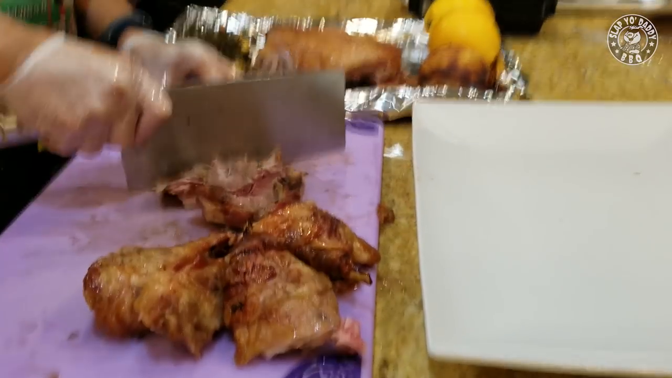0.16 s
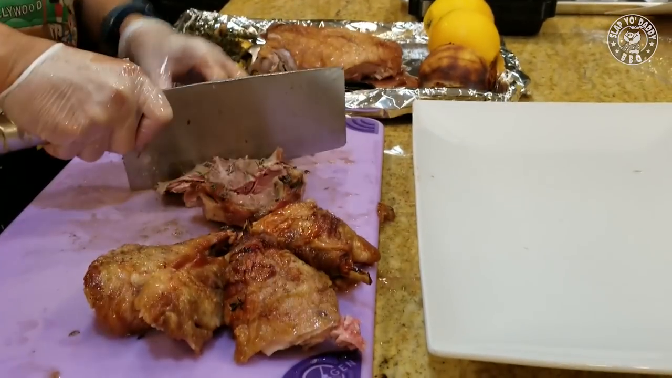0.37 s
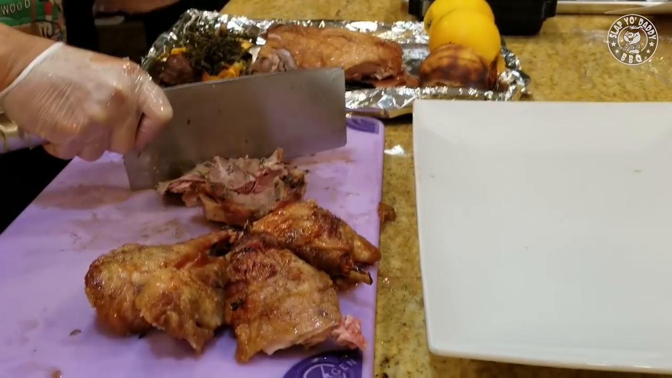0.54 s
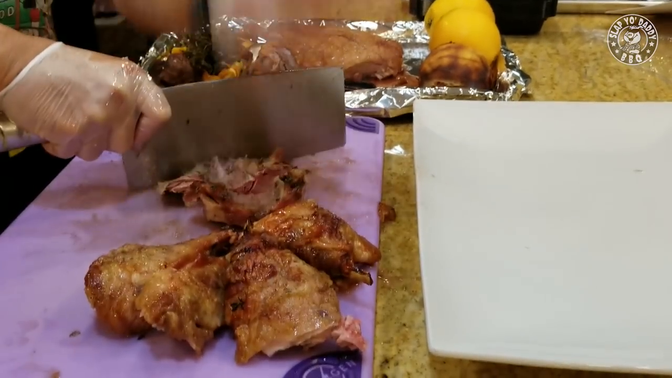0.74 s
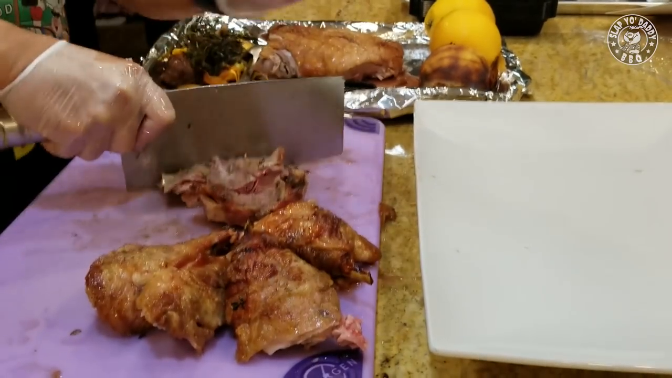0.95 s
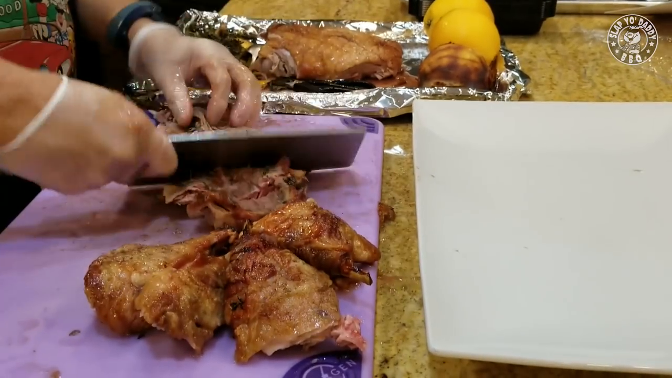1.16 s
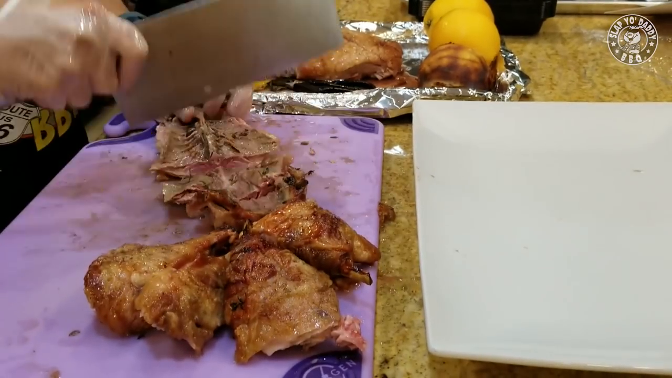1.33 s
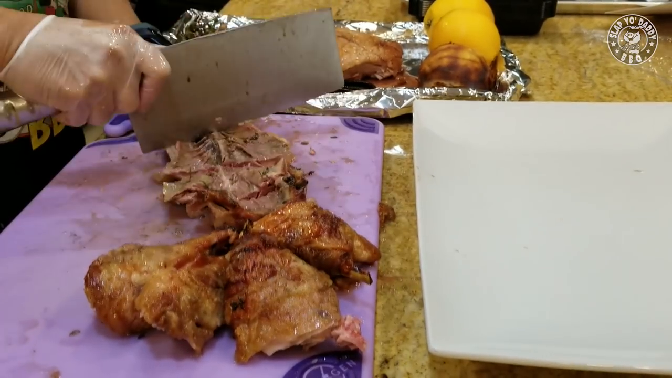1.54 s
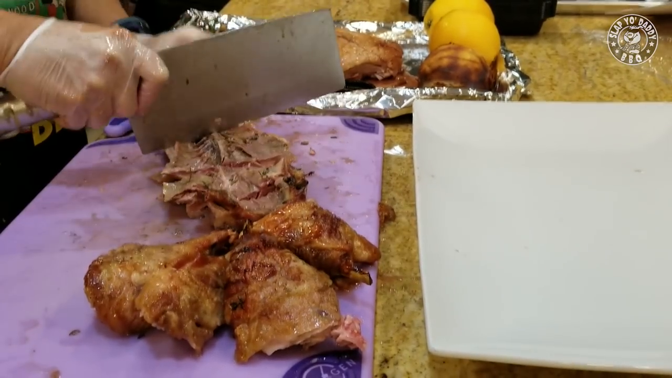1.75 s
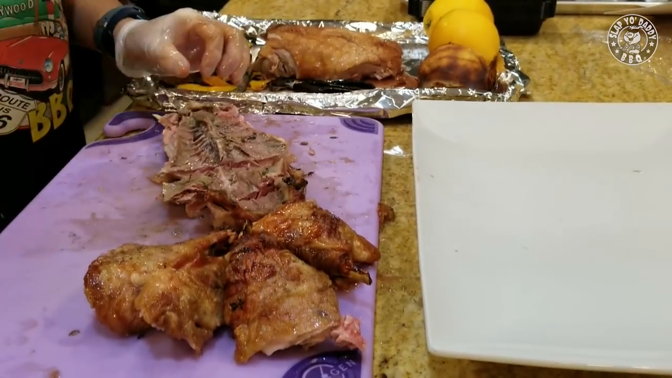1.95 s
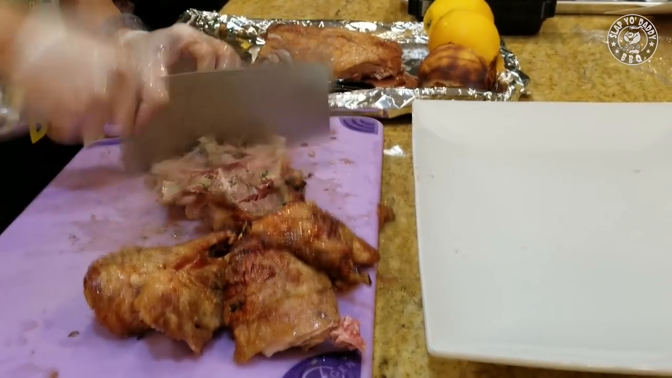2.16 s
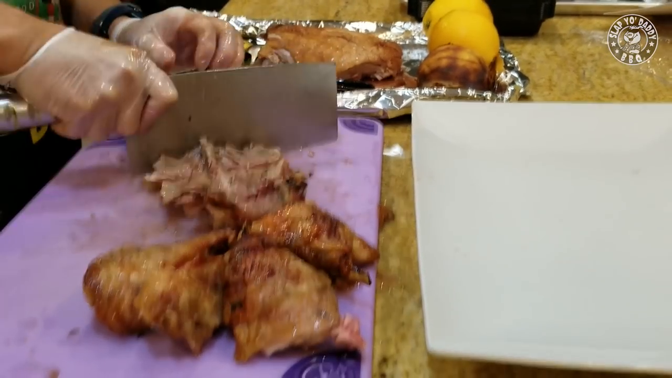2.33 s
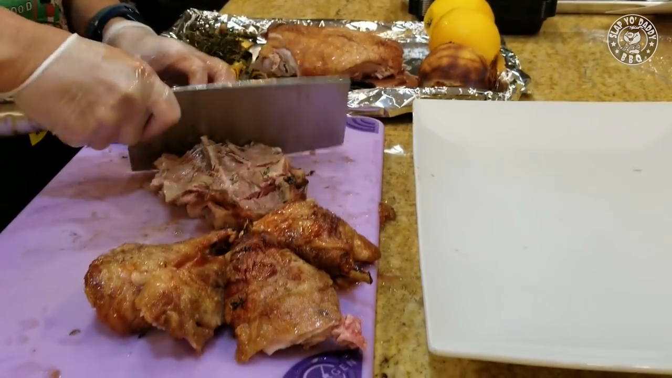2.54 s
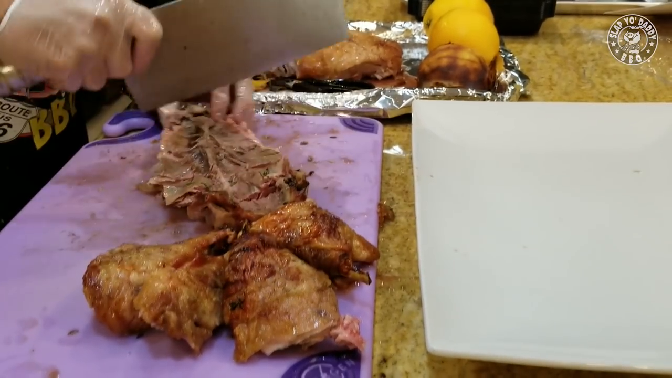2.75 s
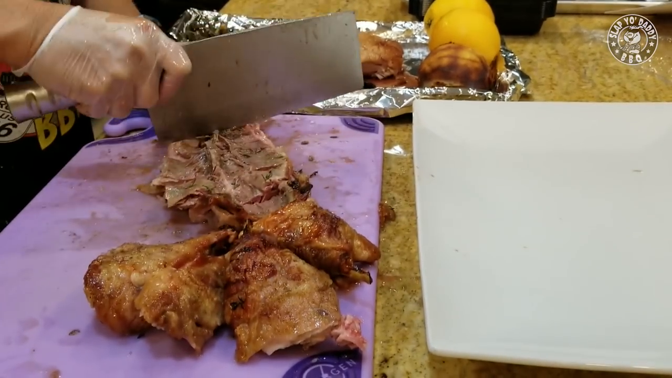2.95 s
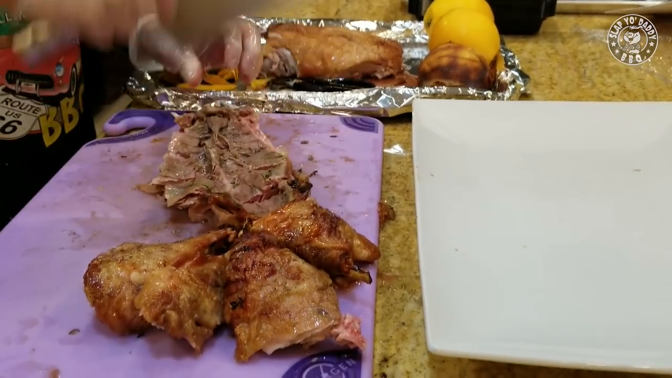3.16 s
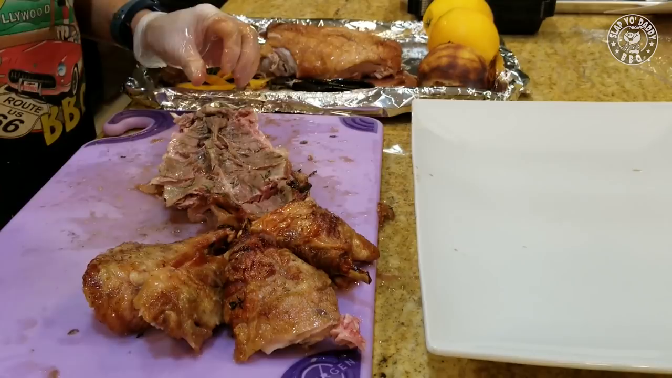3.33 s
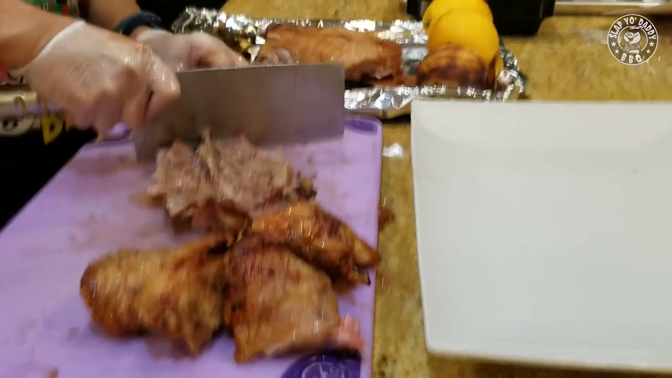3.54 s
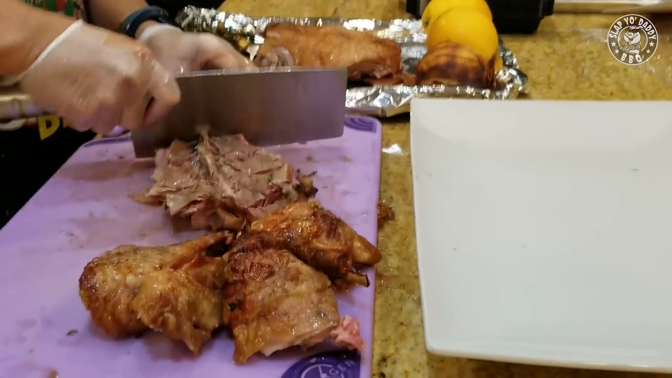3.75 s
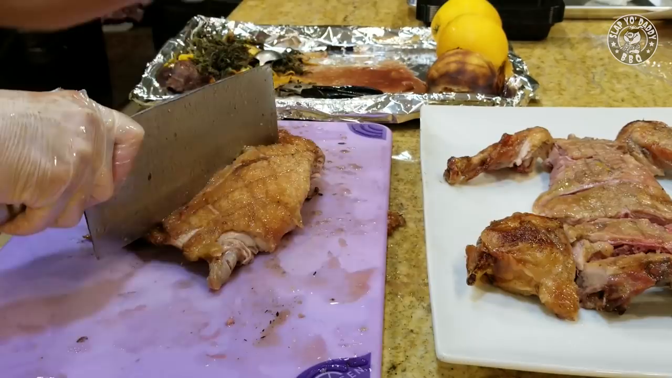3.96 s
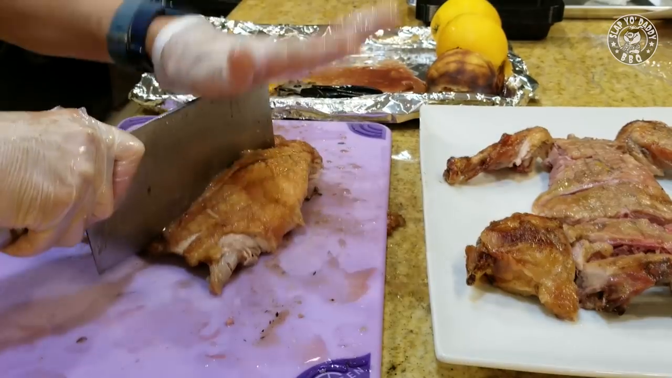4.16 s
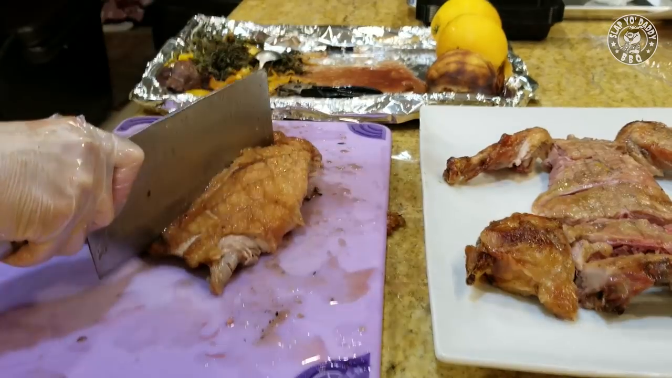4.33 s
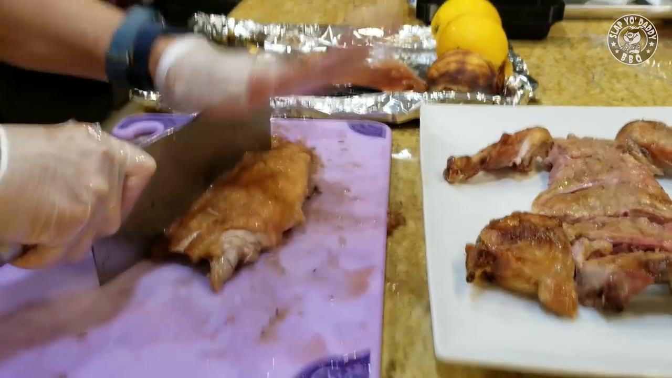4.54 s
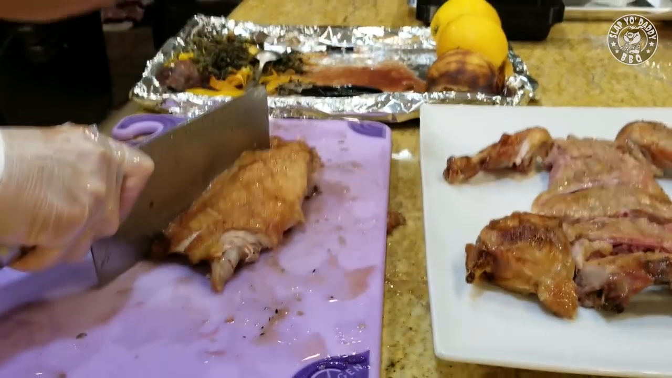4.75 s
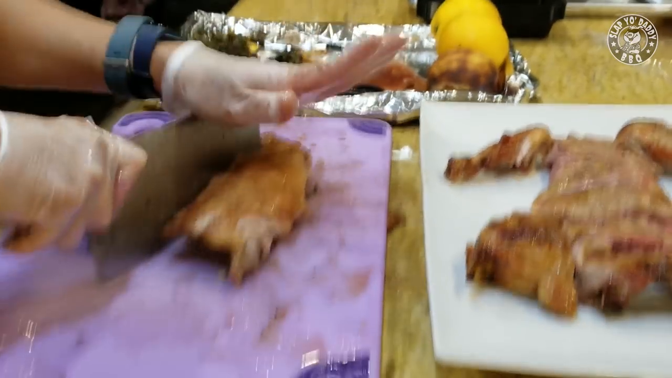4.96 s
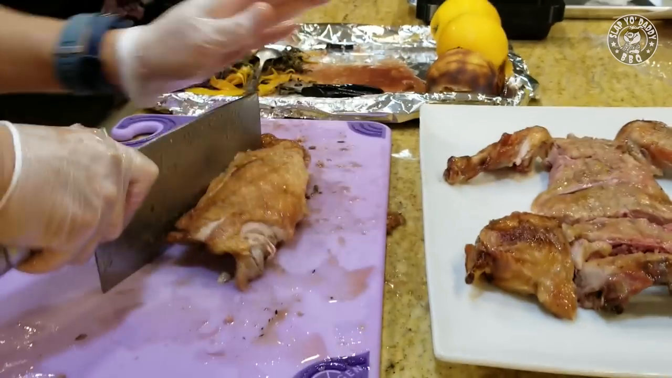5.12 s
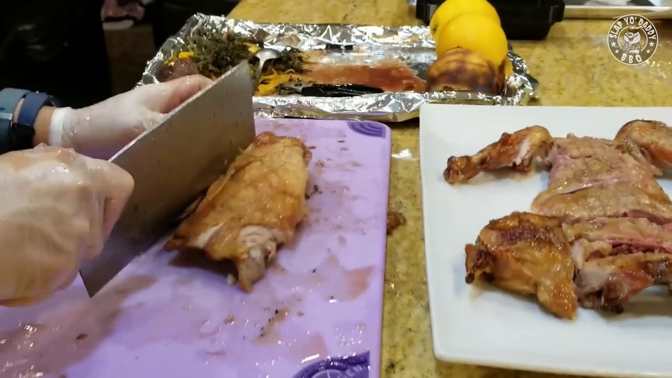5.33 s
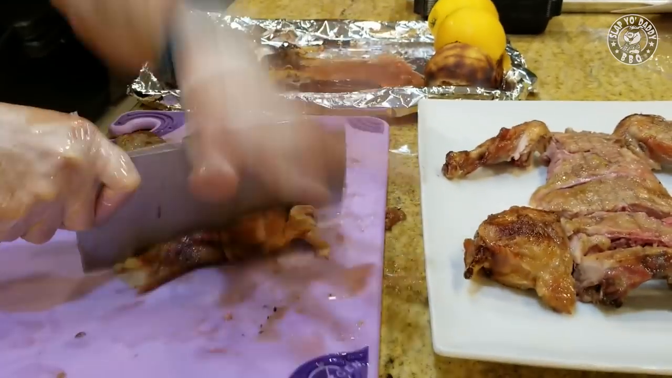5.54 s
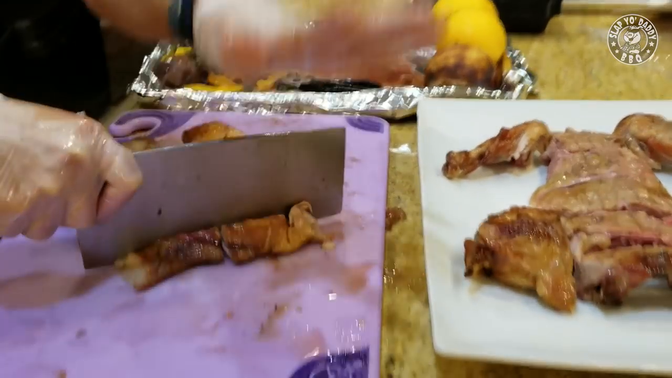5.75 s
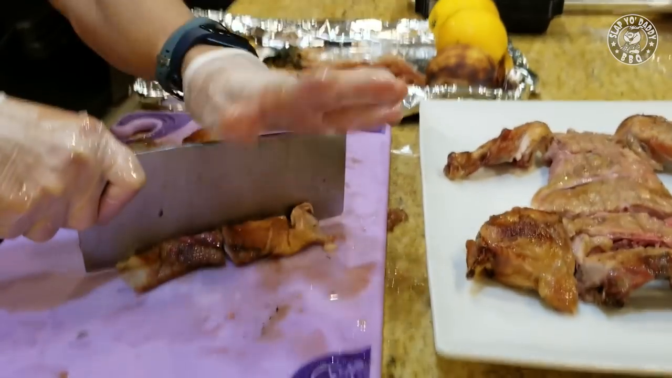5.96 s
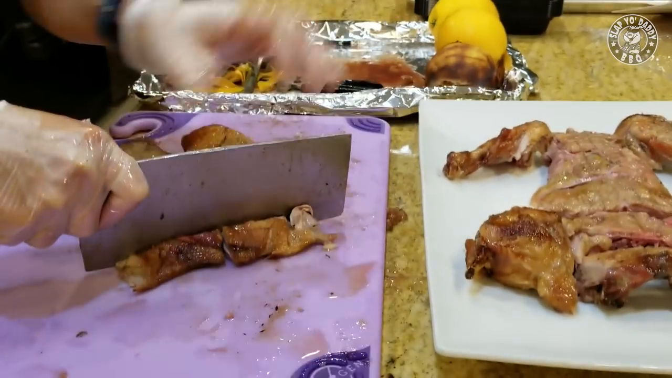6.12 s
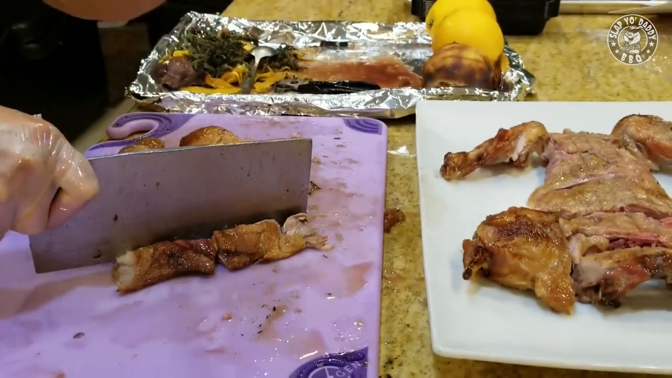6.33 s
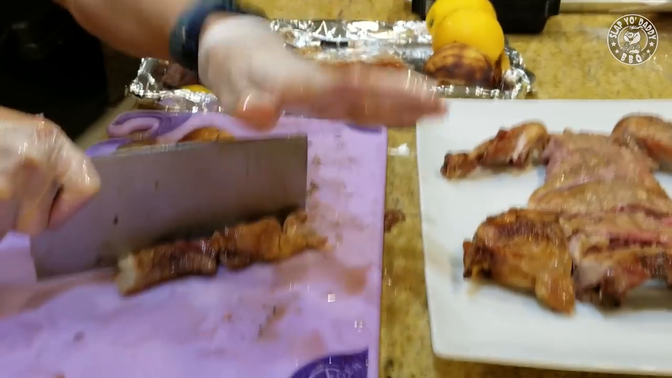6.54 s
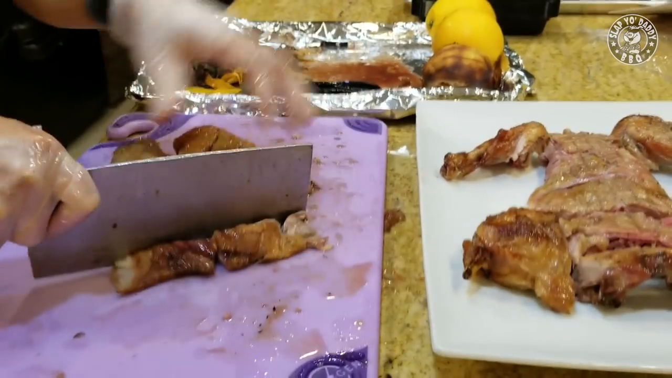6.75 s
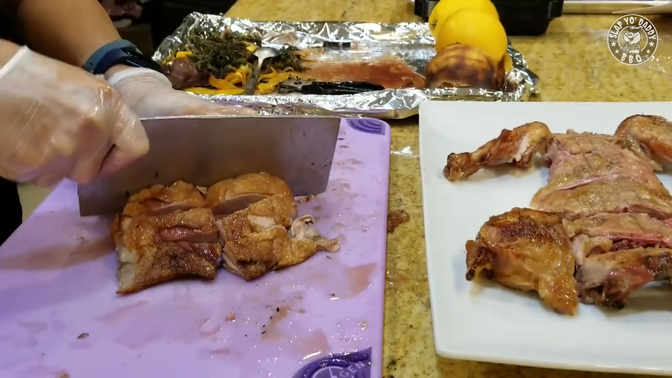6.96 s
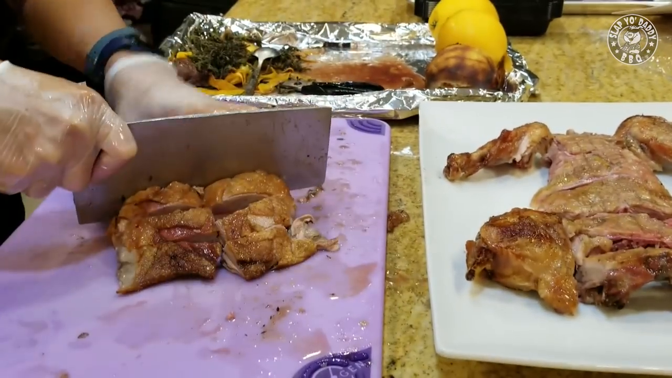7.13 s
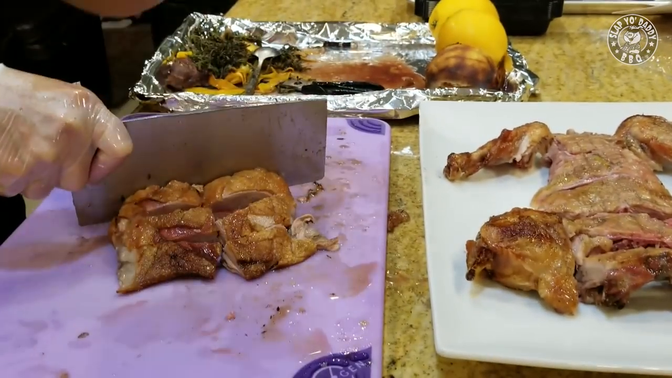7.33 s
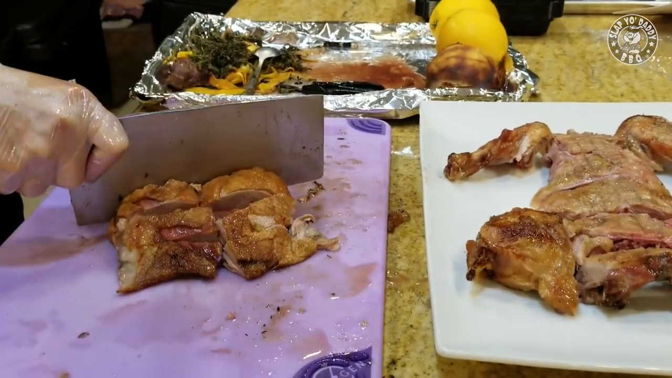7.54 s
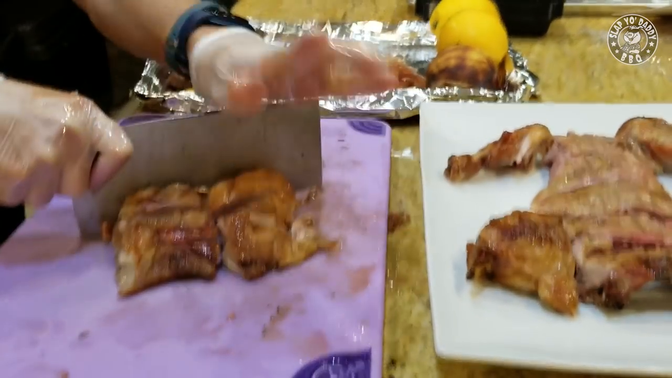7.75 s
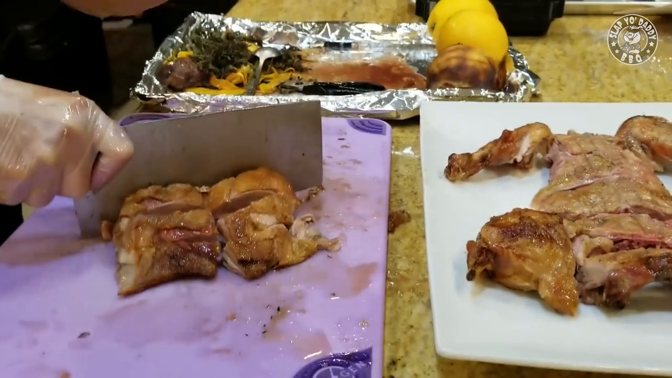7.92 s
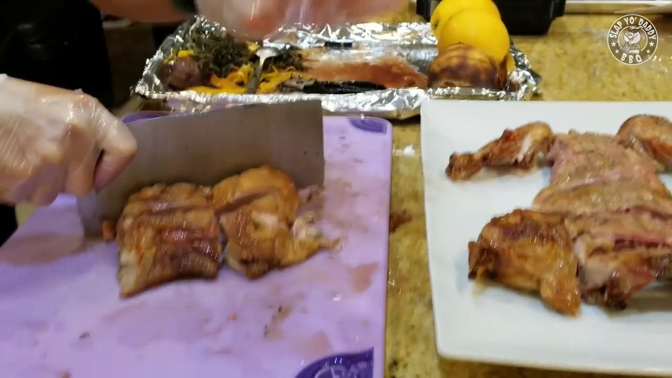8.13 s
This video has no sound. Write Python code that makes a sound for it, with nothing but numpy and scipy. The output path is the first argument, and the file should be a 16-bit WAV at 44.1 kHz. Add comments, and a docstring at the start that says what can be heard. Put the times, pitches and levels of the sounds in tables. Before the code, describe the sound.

A heavy cleaver lands hard, uneven chops through roast meat on a plastic board, foil tray rattling after the blows in a reverberant kitchen.

```python
"""A cleaver chops roast meat on a plastic board on a stone counter, close to two ports in a hard kitchen.
From the start blows crack (resonant bursts), knock (shaped noise), ring board and counter (damped modes) and
fill the room; a foil tray rattles in threes (noise ticks). Between 1.1 and 3 s the blade tinks four times (modes).
The noise hum and hiss drift, drop at 2.15 s and jump up at 3.98, 5.45 and 6.99 s.
Near 7.2 s a piece slides over the board (swelling noise); two more blows end the scene."""
import sys
import numpy as np
from scipy import signal
from scipy.fft import rfft, irfft, next_fast_len
from scipy.io import wavfile
from scipy.ndimage import uniform_filter1d, map_coordinates

SR = 44100
rng = np.random.default_rng(int(sys.argv[2]) if len(sys.argv) > 2 else 0)


def store_pcm(level_fs):
    """Save levels as 16-bit WAV."""
    pcm = np.round(np.clip(level_fs, -1, 1) * 32767).astype(np.int16)
    wavfile.write(sys.argv[1], SR, np.atleast_2d(pcm).T)


N = 361046


def amp(db):
    """Gain of a level in dB."""
    return 10 ** (np.asarray(db) / 20)


def unit(x):
    """x at rms 1."""
    return x / np.sqrt(np.mean(x ** 2) + 1e-20)


def along(points, hz):
    """(Hz, value) points interpolated on a log frequency axis."""
    f, v = np.transpose(points)
    return np.interp(np.log(hz + 1), np.log(f + 1), v)


def curves(rows):
    """One value per sample for each column after the time."""
    s, *cols = np.transpose(rows)
    return [np.interp(np.arange(N) / SR, s, c) for c in cols]


def filtered(x, response):
    """x times a complex response of frequency."""
    n = x.shape[-1]
    m = next_fast_len(n + 8192)
    return irfft(rfft(x, m) * response(np.fft.rfftfreq(m, 1 / SR)), m)[..., :n]


def thin(x):
    """x through a two-pole high-pass: skin and knock hold little bass."""
    low_hz = 250
    return filtered(x, lambda f: (1j * f / (low_hz + 1j * f)) ** 2)


# Stereo likeness. Each row: frequency in Hz, left-right correlation (below 0 counts as 0).
LIKENESS = [(60, 0.95), (180, 0.98), (550, 0.65), (1650, -0.056), (4970, 0.1), (15000, -1)]


def rush(spectrum, size):
    """Stereo noise of rms 1; mid and side are mixed for the likeness at each frequency."""
    turn = lambda hz: np.arccos(np.clip(along(LIKENESS, hz), 0, 1)) / 2
    mid, side = filtered(rng.standard_normal((2, size)),
                         lambda hz: spectrum(hz) * [np.cos(turn(hz)), np.sin(turn(hz))])
    return unit(np.array([mid + side, mid - side]))


def wobble(rate):
    """A smooth random curve, rate knots a second."""
    return map_coordinates(rng.standard_normal(N // 100), [np.arange(N) * rate / SR])


def ring(modes_hz, modes, t, rough=0.093):
    """Damped modes at new strengths each time; loose contact makes each waver in strength and phase."""
    knots = rng.standard_normal((2, len(modes), 100))
    knot_at = np.arange(100)
    total = 0
    for hz, (db, t60), a, b in zip(modes_hz, modes, *knots):
        in_phase = np.interp(t * 45, knot_at, a)
        quadrature = np.interp(t * 45, knot_at, b)
        waver = 1 + rough * (in_phase + 1j * quadrature)
        level = amp(db + rng.normal(0, 0.83) - 60 * t / t60)
        total = total + level * np.imag(waver * np.exp(2j * np.pi * hz * t))
    return total


def add(out, s, sound):
    """Mix a sound in at a time in seconds."""
    part = out[:, round(s * SR):][:, :sound.shape[-1]]
    part += sound[..., :part.shape[-1]]


# Blows. Each row: start in seconds, level in dB, room in dB, crunch in seconds, thump in dB, snap in dB,
# treble in dB, skin in dB, board ring in dB, crack in dB.
# Room, skin, ring and crack are relative to the level; thump, snap and treble tilt the spectrum.
# Level, room and crack are before the trims in the code.
BLOWS = [(0.05, 1.5, -6, 0.031, 5.5, 3.5, 2, -44, -22.5, -18),
         (0.733, 5, -11, 0.005, 10.5, 4, -6, -28, -23, -15),
         (1.163, -27, -29, 0.021, -8, -3, 3, -32, -30, -13),
         (2.154, 3, -6, 0.025, -4.5, 7, -7.5, -16, -26, -15),
         (2.202, 5, -12.5, 0.012, -6.5, -1.5, -15, -32, -27, -32.5),
         (2.225, -14, -14.5, 0.021, 17.5, 5, 3.5, -8, -22.5, 0),
         (2.924, -32, -18, 0.014, 12, 8, 8, -31, -28, -18),
         (3.407, 4.5, -14.5, 0.033, -4.5, 1, -4, -20.5, -26.5, -16),
         (3.459, -8.5, -5, 0.018, 4.5, -6.5, -16, -33, -21, -7.5),
         (4.085, -13, -12.5, 0.007, -8.5, 1, 2, -19.5, -36, -9.5),
         (4.094, -21.5, -16, 0.035, -10, 8, 6, -30, -26.5, -1.5),
         (4.5, 4, -10.5, 0.0085, 12, 8, -0.5, -20.5, -29.5, -9.5),
         (4.838, 8, -13, 0.041, 11.5, 4, -6, -43, -27.5, -18),
         (5.546, 4, -9, 0.033, 13.5, 3, -1.5, -18, -22, -18),
         (5.878, -1.5, -10.5, 0.0062, 16.5, 14.5, 1.5, -20.5, -26, -7),
         (6.432, -4, -0.5, 0.024, 10.5, 17, -1, -39.5, -31, -12.5),
         (6.469, 1.5, -12.5, 0.0099, -3, 10.5, -10.5, -17, -26.5, -44.5),
         (7.603, 5.5, -9, 0.03, 10.5, 2.5, -1.5, -29, -23.5, -13),
         (7.984, -2.5, -12, 0.02, 19, 10, 2.5, -21.5, -28, -4)]
# Chop spectrum. Each row: frequency in Hz, density in dB per Hz before the tilt.
CHOP_SPECTRUM = [(24, -47.5), (40, -8.5), (271, -12.5), (349, -12.5), (550, -7), (844, -3), (933, 0.5),
                 (1290, -6), (1620, -9), (7180, -24.5), (8790, -25.5), (12800, -25), (15300, -30.5),
                 (16500, -49.5)]
# Room decay. Each row: frequency in Hz, t60 in seconds.
ROOM_T60 = [(60, .6), (300, 0.38), (1000, 0.43), (3000, 0.5), (8000, 0.58), (16000, 0.79)]
# Board modes: frequency in Hz; then each row: strength in dB, t60 in seconds.
BOARD_HZ = [527, 560, 652, 916, 957, 1055, 1222, 1570, 1690]
BOARD_MODES = [(-5.5, 0.19), (-2, 0.19), (-4.5, 0.4), (4, 0.29), (0, 0.1), (-12, 0.33), (-8, 0.36),
               (-6, 0.34), (-9, 0.52)]
# Counter modes: frequency in Hz; then each row: strength in dB, t60 in seconds.
COUNTER_HZ = [68, 76, 103, 116, 133, 161, 197, 281]
COUNTER_MODES = [(-10, 0.57), (1, 0.98), (-16, 1.1), (-11.5, 1.3), (-6.5, 1.4), (-6.5, 1.1), (-3.5, 0.99),
                 (3, 0.21)]
COUNTER_DB, COUNTER_DB_PER_THUMP_DB = -37.5, .45  # relative to the blow's level
SKIN_LEAD_S = .008  # the skin gives way this long before the edge lands


def chops():
    """Skin gives way, a knock on the board, then the room: full while the blade crunches, dying band by band."""
    out, t = np.zeros((2, N)), np.arange(SR) / SR
    short = t[:SR // 10]
    skin_fade = 1.2 * amp(-60 * short / 0.03) + 0.75 * amp(-60 * short / 0.092)
    skin_fade = skin_fade * (1 - np.exp(-short / 0.0013))
    knock_fade = amp(-60 * short / .045) * (1 - np.exp(-short / 0.00049))
    for s, db, room_db, crunch_s, thump_db, snap_db, treble_db, skin_db, board_db, _ in BLOWS:
        tilt = [(45, thump_db - 14.5), (90, thump_db + 1.5), (250, thump_db),
                (900, 0.029), (2500, snap_db), (9000, treble_db)]
        tone = lambda hz: amp(along(CHOP_SPECTRUM, hz) + along(tilt, hz))
        bright = lambda hz: tone(hz) * (hz / 1000) ** 0.069

        hz, frame_s, z = signal.stft(rush(tone, size=SR), SR, nperseg=256)
        late_s = np.maximum(frame_s - crunch_s, 0)
        # bone and gristle break unevenly: lumps a few ms long, each over a stretch of the spectrum
        lumps = unit(uniform_filter1d(rng.standard_normal(z.shape[1:]), size=12, axis=0))
        decay_db = 1.3 * lumps - 60 * late_s / along(ROOM_T60, hz)[:, None]
        room = signal.istft(z * amp(decay_db), SR, nperseg=256)[1][:, :SR]

        skin = amp(db + skin_db) * skin_fade * rush(bright, size=len(short))
        add(out, s - SKIN_LEAD_S, thin(skin))
        knock = amp(db - 8.5) * knock_fade * rush(bright, size=len(short))
        add(out, s, thin(knock))
        add(out, s, amp(db + room_db - 7) * room * (1 - np.exp(-t / 0.00082)))
        # the two ports hear the board's modes at unlike strengths
        board = np.array([ring(BOARD_HZ, BOARD_MODES, t), ring(BOARD_HZ, BOARD_MODES, t)])
        add(out, s, amp(db + board_db) * board)
        counter_db = COUNTER_DB + COUNTER_DB_PER_THUMP_DB * thump_db
        counter = ring(COUNTER_HZ, COUNTER_MODES, t, rough=0.4) * (1 - np.exp(-t / 0.012))
        add(out, s, amp(db + counter_db) * counter)
    return out


CRACK_HZ, CRACK_OCT_PER_DB = 2200, .045  # a snappier blow cracks higher
CRACK_T60_S, CRACK_Q = .008, 1.2  # decay of the driving noise; sharpness of the resonance


def cracks():
    """The edge meets the board: decaying noise drives a resonance for a few fast cycles."""
    out, t = np.zeros((2, N)), np.arange(SR // 20) / SR
    for s, db, *_, snap_db, _, _, _, crack_db in BLOWS:
        c = CRACK_HZ * 2 ** (CRACK_OCT_PER_DB * snap_db)
        spikes = rng.standard_normal((2, len(t))) * amp(-60 * t / CRACK_T60_S)
        band = lambda f: 1j * f * c / CRACK_Q / (c * c - f * f + 1j * f * c / CRACK_Q)
        burst = filtered(spikes, lambda f: band(f) ** 2)
        burst = burst + 0.7 * burst[::-1]  # leak between the sides
        add(out, s + .0008, amp(db + crack_db + 5) * burst / np.abs(burst).max())
    return out


# Tray rattles, three evenly paced hops each. Each row: first hop in seconds, last hop in seconds,
# level in dB before the trims in the code, loss in dB a hop.
RATTLES = [(0.16, 0.241, -12.5, 2.5), (0.3335, .3722, -22, 3.5), (0.835, 0.913, -18, 0.5),
           (2.254, 2.355, -20, 2), (3.559, 3.626, -15, 7.5), (4.1335, 4.21, -26, 13),
           (4.388, 4.405, -35, 3), (4.6, 4.683, -12, 2), (4.78, 4.86, -28, 13.5),
           (4.945, 5.023, -17.5, -0.5), (5.119, 5.148, -27, 4.5), (5.649, 5.7323, -14.5, 1.5),
           (5.792, 5.867, -23.5, 0), (6.016, 6.086, -23, 4), (6.535, 6.608, -27, -1),
           (7.568, 7.65, -36, 15), (7.71, 7.7885, -11.5, 5), (8.085, 8.164, -19, 0.8)]
# Foil spectrum. Each row: frequency in Hz, density in dB per Hz.
FOIL_SPECTRUM = [(1500, -46), (4000, -6), (8000, -2), (10000, -4.5), (13000, 2.5), (16000, -6.5)]
SECOND_HOP_DB, RUSTLE_T60_S = 2, 0.18  # lift of the middle hop; decay of the papery hiss


def foil():
    """Each hop of the tray is a sharp noise tick with a short papery hiss behind it."""
    out, t = np.zeros((2, N)), np.arange(SR // 5) / SR
    fade = amp(-60 * t / 0.017) + 0.37 * amp(-60 * t / RUSTLE_T60_S)
    fade = fade * (1 - np.exp(-t / 0.00074))
    for first_s, last_s, db, loss_db in RATTLES:
        for hop in range(3):
            level_db = db - 9 - loss_db * hop + SECOND_HOP_DB * (hop == 1)
            noise = rush(lambda hz: amp(along(FOIL_SPECTRUM, hz)), size=len(t))
            add(out, first_s + (last_s - first_s) * hop / 2, amp(level_db) * fade * noise)
    return out


# Blade touches. Each row: start in seconds, tick in dB before its trim, tick centre in Hz, ring in dB,
# most woken pitch in Hz, fall away from it in dB per square root of an octave.
TOUCHES = [(1.1636, -42, 1100, -46, 2500, 13), (1.482, -40, 3400, -59, 6983, 30),
           (1.764, -56, 5000, -59, 5703, 30), (2.9243, -46, 1100, -64, 4299, 20)]
# Blade modes: frequency in Hz, t60 in seconds, strength in dB.
BLADE_HZ = [2115, 2442, 2630, 3435, 4299, 4950, 5703, 6511, 6983, 7900, 8520, 9525]
BLADE_T60_S = [.2, .2, .33, .15, .3, .12, .3, .2, .2, .22, .2, .12]
BLADE_DB = [0, 0, 0, 0, -1, 1, -4, 1, -2, -3, -6, -6]
RING_DELAY_S = .003


def blade():
    """A light touch ticks, then the steel rings briefly; each spot wakes the modes near its own pitch."""
    out, t = np.zeros((2, N)), np.arange(SR // 2) / SR
    tick_fade = amp(-60 * t / 0.032) + 0.23 * amp(-60 * t / 0.63)
    for s, tick_db, tick_hz, ring_db, spot_hz, fall_db in TOUCHES:
        peaked = lambda hz: (hz > 700) * amp(-12 * abs(np.log2(hz / tick_hz + 0.0092)))
        add(out, s, amp(tick_db - 7) * tick_fade * rush(peaked, size=len(t)))
        octaves_away = abs(np.log2(np.array(BLADE_HZ) / spot_hz))
        woken_db = ring_db + np.array(BLADE_DB) - fall_db * np.sqrt(octaves_away)
        modes = list(zip(woken_db, BLADE_T60_S))
        steel = np.array([ring(BLADE_HZ, modes, t, rough=.5), ring(BLADE_HZ, modes, t, rough=.5)])
        add(out, s + RING_DELAY_S, steel)
    return out


# Scuff spectrum. Each row: frequency in Hz, density in dB per Hz.
SCUFF_SPECTRUM = [(500, -25), (900, 6), (2500, 0), (3200, 4), (4300, 8.5), (5600, 2), (6600, -4),
                  (8000, 2.5), (12800, 5), (15800, -2.5)]
SLIDE_S, SLIDE_DB = 7.19, -29  # fastest moment and its hiss level
SPEED_UP_S, SLOW_DOWN_S = 0.075, 0.1  # time from the fastest moment to 10 dB less
RUB_DB = -5  # rumble relative to the hiss


def slide():
    """A piece rubs over the board, speeding up and slowing down: a hiss with a lumpy rumble under it."""
    t = np.arange(N) / SR - SLIDE_S
    hiss_db = SLIDE_DB - 10 * np.abs(t / np.where(t < 0, SPEED_UP_S, SLOW_DOWN_S)) ** 1.8
    hiss = rush(lambda hz: amp(along(SCUFF_SPECTRUM, hz)), size=N)
    rumble_spectrum = [(90, -20), (230, -2), (900, -15.5), (2000, -37.0)]  # (Hz, dB per Hz)
    rumble = rush(lambda hz: amp(along(rumble_spectrum, hz)), size=N)
    rub = hiss + amp(RUB_DB + 1.9 * wobble(35)) * rumble
    return amp(hiss_db + 0.78 * wobble(85)) * rub


def lingering(db, swell_s, t60_s):
    """Gain that swells after every blow and dies away."""
    out, t = np.zeros((1, N)), np.arange(SR) / SR
    for s, blow_db, room_db, *_ in BLOWS:
        fade = amp(blow_db + room_db + db - 60 * t / t60_s)
        add(out, s, fade * (1 - np.exp(-(t / swell_s) ** 2)))
    return out[0]


# Kitchen levels, one list between jumps. Each row: time in seconds, hum in dB, hiss in dB before its floor.
KITCHEN_LEVELS = [
    [(0.0, -42, -52), (0.47, -49.5, -64), (1.01, -51.5, -52.5), (1.54, -52.5, -64), (2.14, -46, -55.5)],
    [(2.15, -51, -61.5), (2.276, -51.5, -50.5), (2.73, -60.5, -79), (3.704, -56, -57.5), (3.98, -55.5, -64)],
    [(3.984, -43.5, -50), (4.142, -42.5, -54), (4.892, -43.5, -43), (5.266, -51, -55),
     (5.442, -53.5, -63.5)],
    [(5.446, -40.5, -51.5), (5.788, -48.5, -50), (6.17, -50, -56), (6.504, -40, -47.5), (6.985, -61, -76)],
    [(6.989, -43, -48.5), (7.217, -43.5, -49), (7.491, -41.5, -50), (7.951, -46, -54), (8.187, -47, -43)],
]
# Hum and hiss spectra. Each row: frequency in Hz, density in dB per Hz.
HUM_SPECTRUM = [(12, -44.5), (20, -7.5), (75, -1.5), (96, -9.5), (138, -3), (301, -6.5), (424, -12),
                (489, -11), (1500, -22), (1950, -53.5), (3300, -120)]
HISS_SPECTRUM = [(470, -33), (800, -10), (1340, -8.5), (1450, -11), (1920, -8), (2290, -12), (2470, -14),
                 (9570, -29.5), (13800, -30), (16500, -42)]
# What lingers after a blow: a low drone, a hiss, a foil sizzle.
# Each row: level in dB relative to blow plus room, swell in seconds, t60 in seconds.
LINGER = [(-34.5, 0.11, 0.92), (-43, .12, 0.97), (-38, .1, .5)]
QUIETEST_HISS_DB, SIZZLE_DB = -67, -15  # hiss floor; sizzle relative to the hiss


def kitchen():
    """A restless low hum, a smooth hiss and a thin sizzle, all noise; each swells for a while after a blow."""
    hum_db, hiss_db = curves(np.concatenate(KITCHEN_LEVELS))
    hiss_db = np.maximum(hiss_db, QUIETEST_HISS_DB)
    steady_db = [hum_db, hiss_db, hiss_db + SIZZLE_DB]
    # powers of steady and lingering sound add
    low, mid, top = [np.hypot(amp(db), lingering(*row)) for db, row in zip(steady_db, LINGER)]
    hum = low * amp(0.47 * wobble(15.0)) * rush(lambda hz: amp(along(HUM_SPECTRUM, hz)), size=N)
    hiss = mid * amp(0.82 * wobble(37)) * rush(lambda hz: amp(along(HISS_SPECTRUM, hz)), size=N)
    sizzle_spectrum = [(5000, -29.5), (9000, -1.5), (13000, -5.0), (16000, -4)]  # (Hz, dB per Hz)
    sizzle = top * amp(1.3 * wobble(30)) * rush(lambda hz: amp(along(sizzle_spectrum, hz)), size=N)
    return hum + hiss + sizzle


def scene():
    """Everything on and around the board."""
    return chops() + cracks() + foil() + blade() + slide() + kitchen()


# Microphone response. Each row: frequency in Hz, gain in dB.
MIC_RESPONSE = [(60, -5), (8000, 0), (8700, -6.5), (10500, -7.5), (13000, 0), (15500, -3.5)]
# Port imbalance. Each row: frequency in Hz, left minus right in dB.
PORT_BALANCE = [(60, 0.5), (180, -2), (550, 0), (1650, -0.5), (4970, 0), (15000, -6)]
TOP_HZ, CEILING = 16000, .97


def record(dry):
    """Two unlike ports with a dip below their treble peak, a soft ceiling, nothing above the band limit."""
    ports = filtered(dry, lambda hz: amp(along(MIC_RESPONSE, hz) + along(PORT_BALANCE, hz) * [[.5], [-.5]]))
    soft = ports / (1 + np.abs(ports / CEILING) ** 6) ** (1 / 6)
    return filtered(soft, lambda hz: np.clip((TOP_HZ - hz) / 200, 0, 1))


dry = scene()
out = record(dry)
store_pcm(out)
```